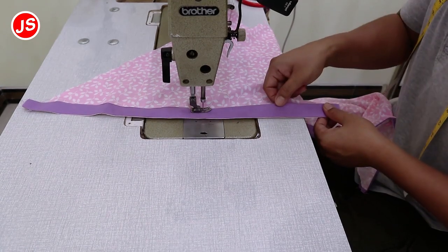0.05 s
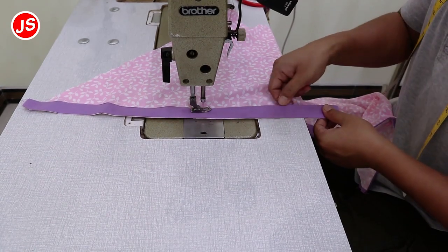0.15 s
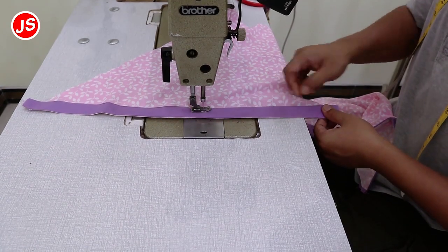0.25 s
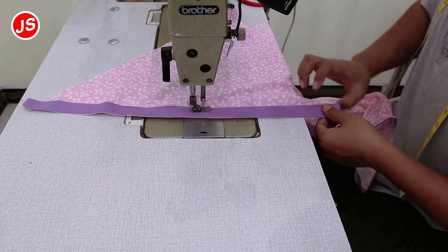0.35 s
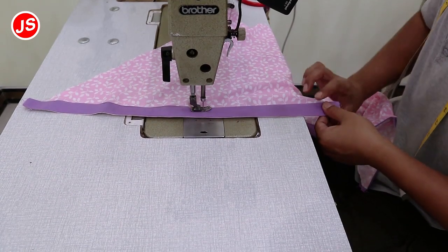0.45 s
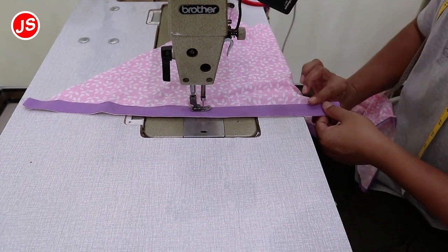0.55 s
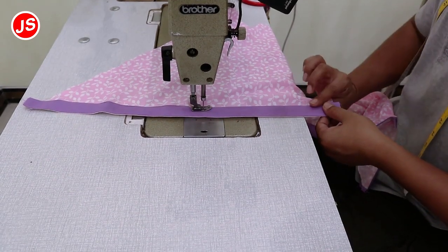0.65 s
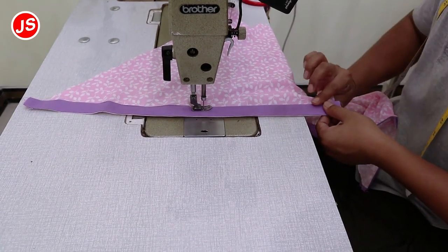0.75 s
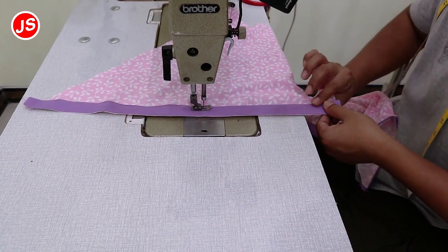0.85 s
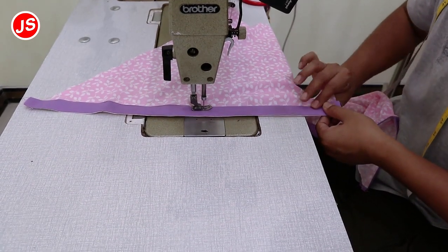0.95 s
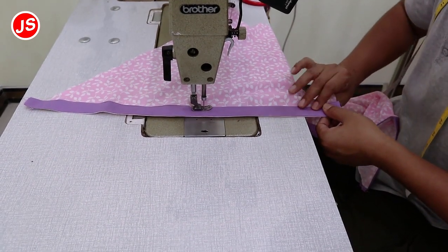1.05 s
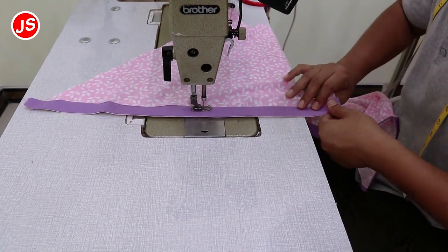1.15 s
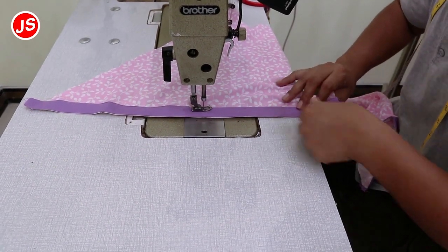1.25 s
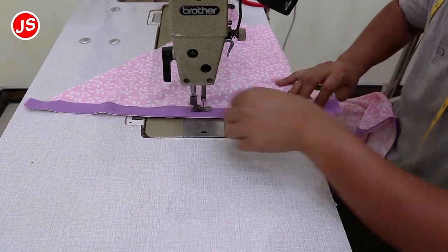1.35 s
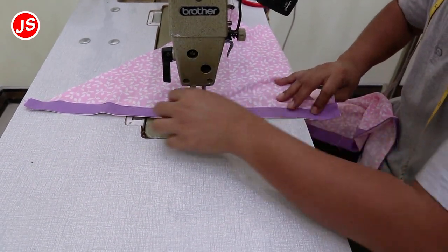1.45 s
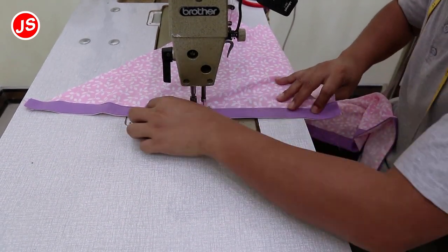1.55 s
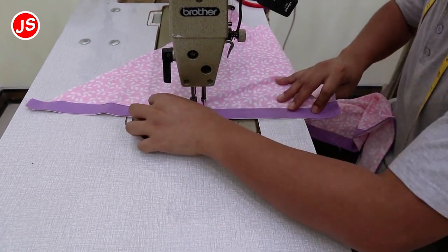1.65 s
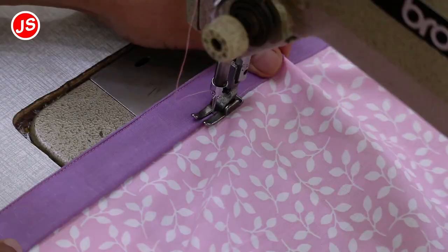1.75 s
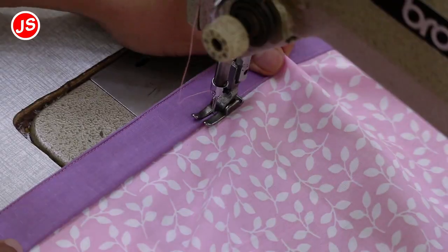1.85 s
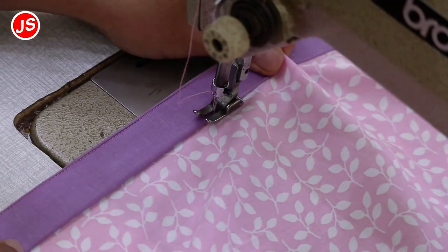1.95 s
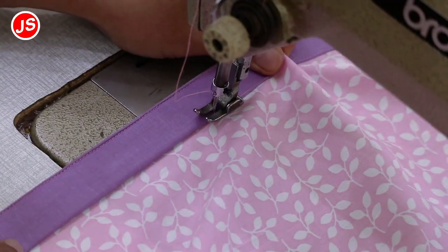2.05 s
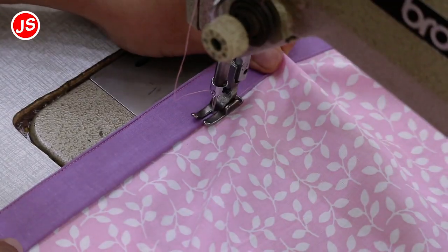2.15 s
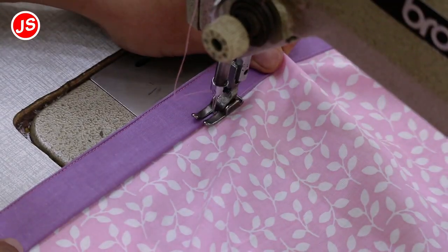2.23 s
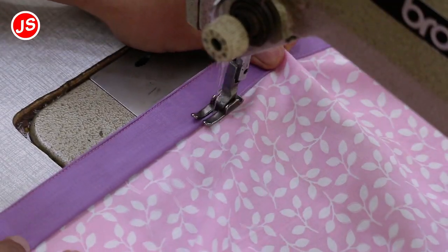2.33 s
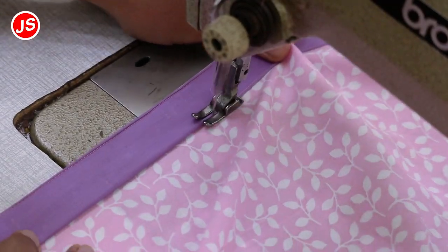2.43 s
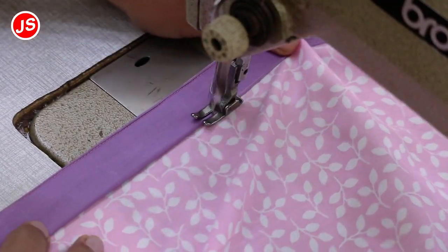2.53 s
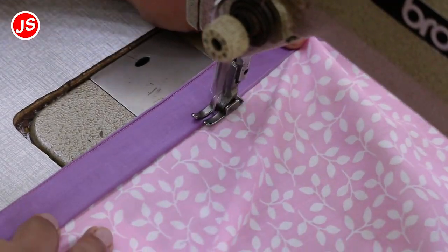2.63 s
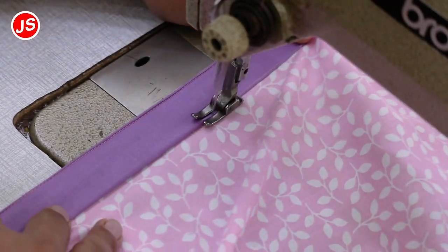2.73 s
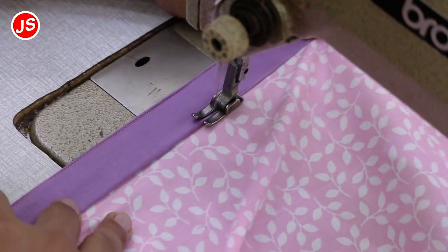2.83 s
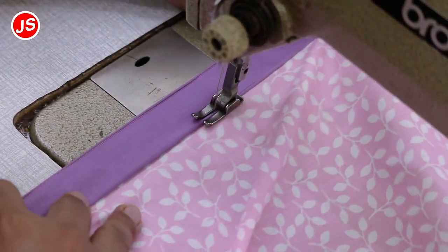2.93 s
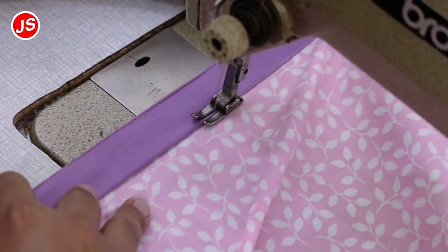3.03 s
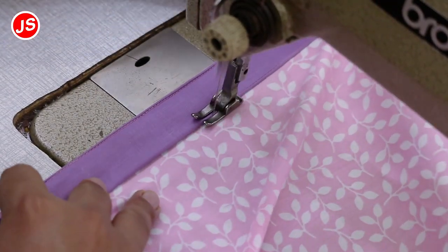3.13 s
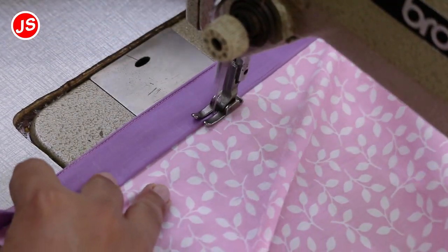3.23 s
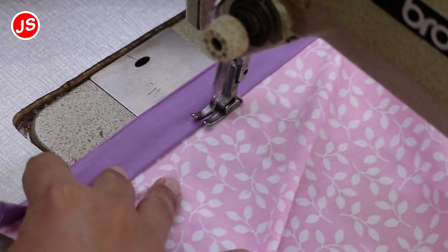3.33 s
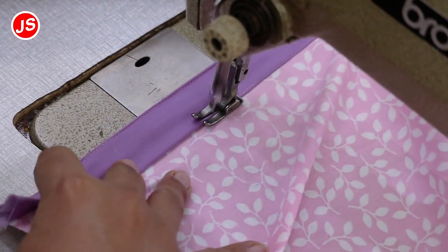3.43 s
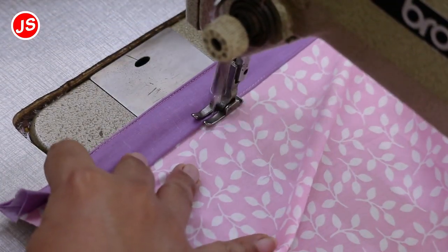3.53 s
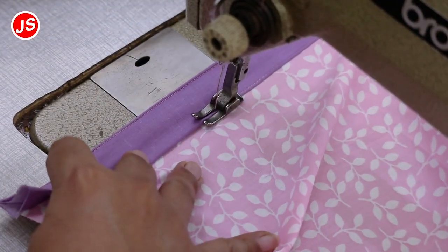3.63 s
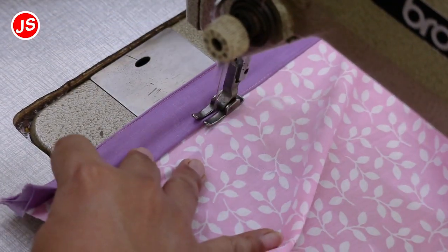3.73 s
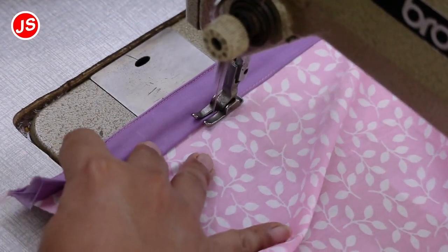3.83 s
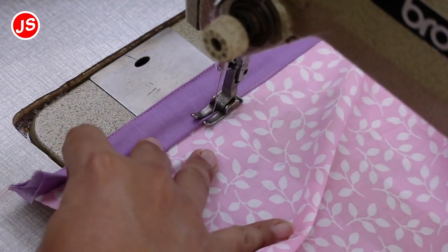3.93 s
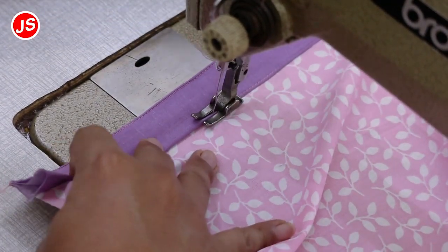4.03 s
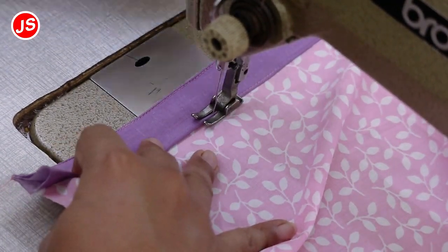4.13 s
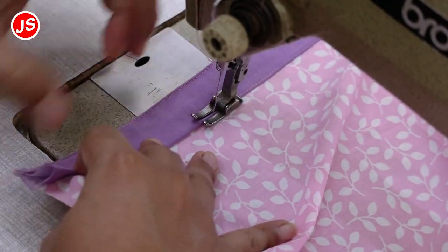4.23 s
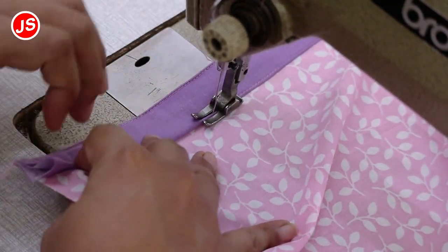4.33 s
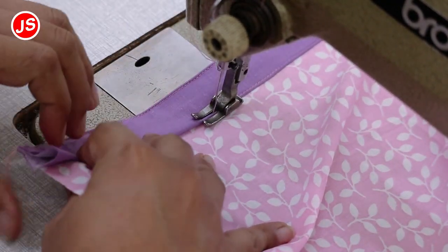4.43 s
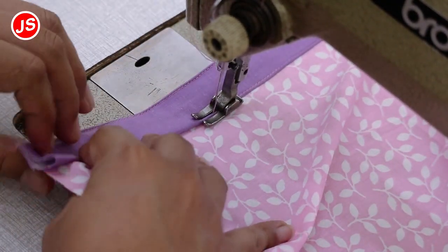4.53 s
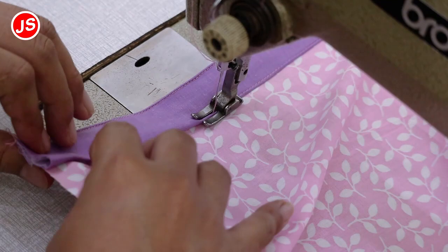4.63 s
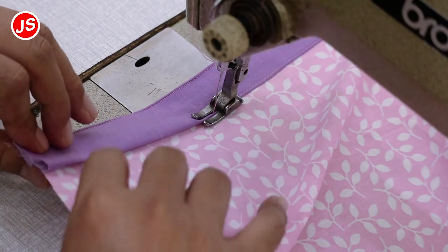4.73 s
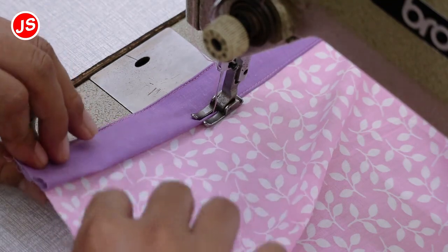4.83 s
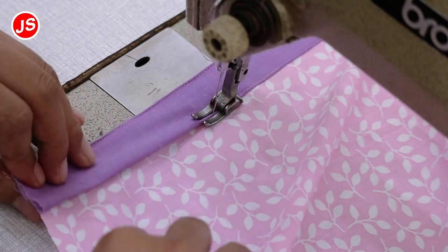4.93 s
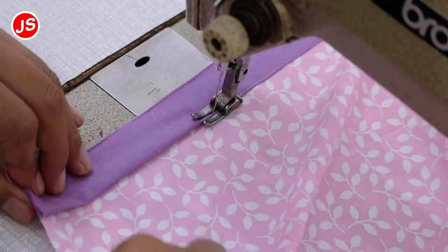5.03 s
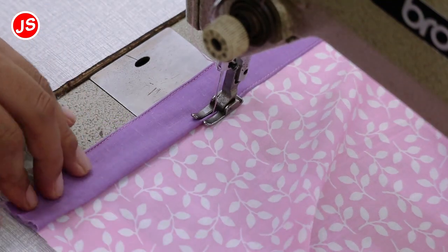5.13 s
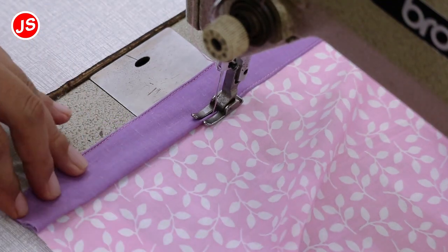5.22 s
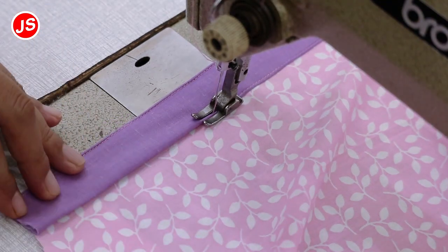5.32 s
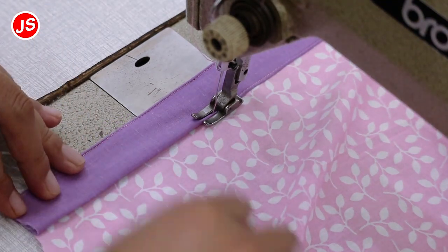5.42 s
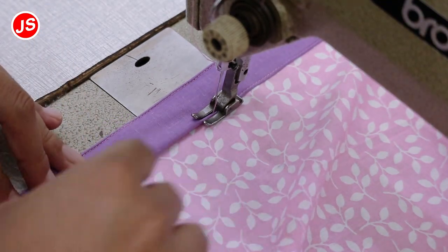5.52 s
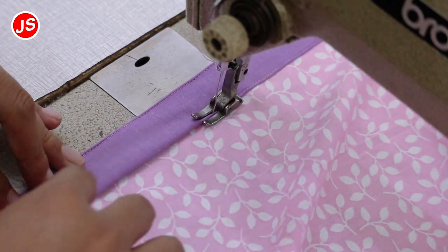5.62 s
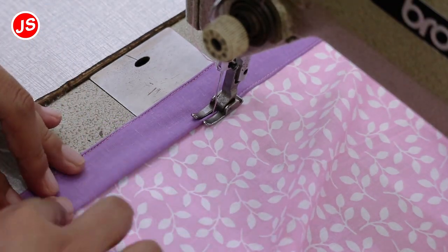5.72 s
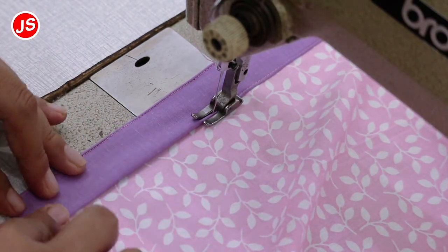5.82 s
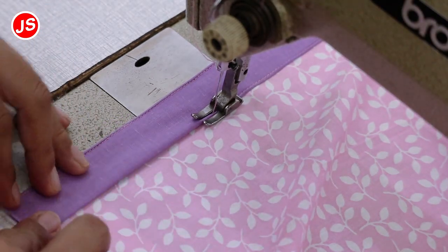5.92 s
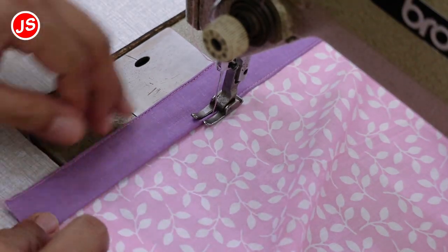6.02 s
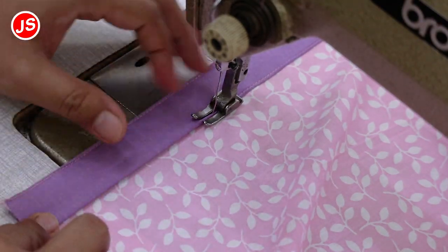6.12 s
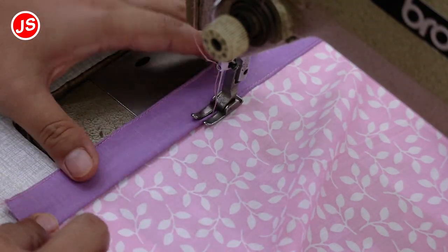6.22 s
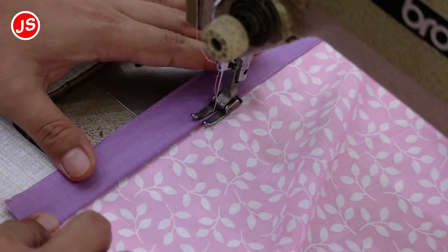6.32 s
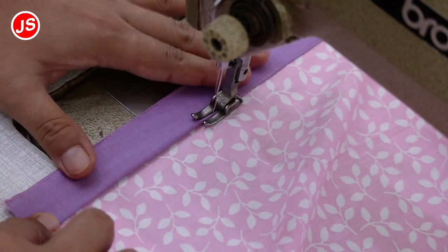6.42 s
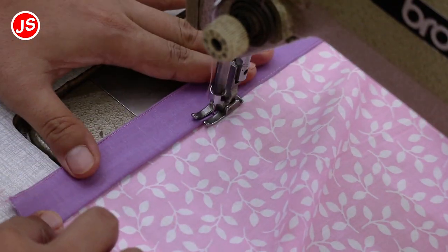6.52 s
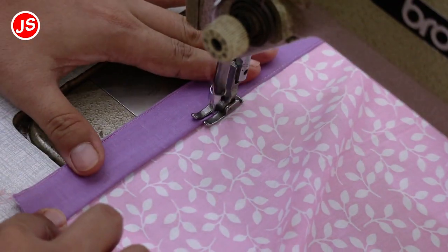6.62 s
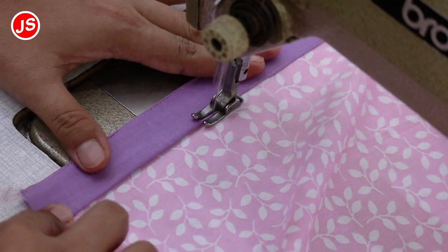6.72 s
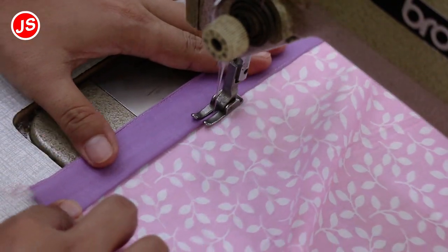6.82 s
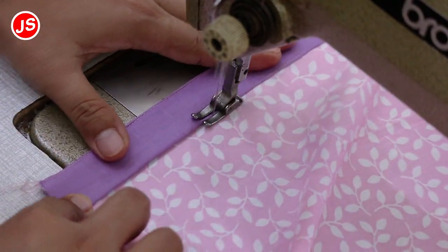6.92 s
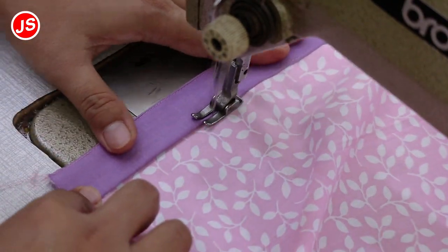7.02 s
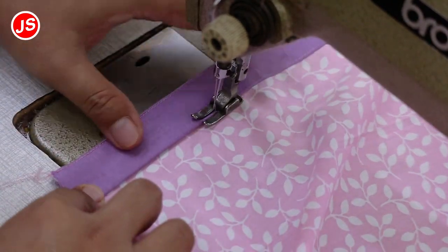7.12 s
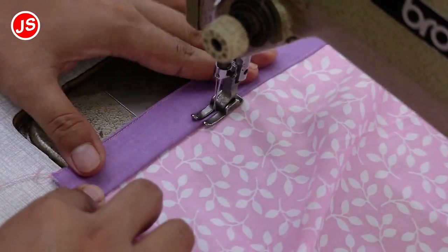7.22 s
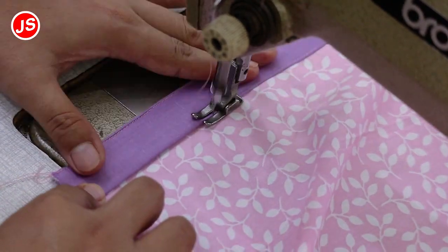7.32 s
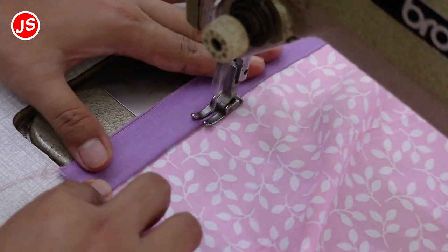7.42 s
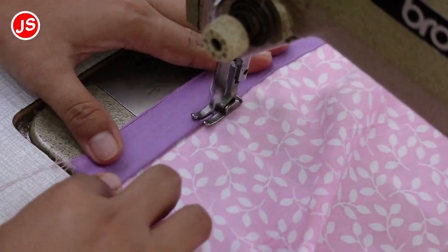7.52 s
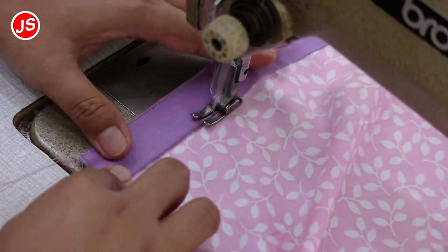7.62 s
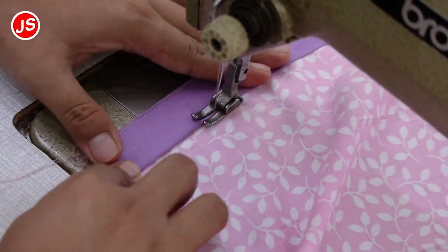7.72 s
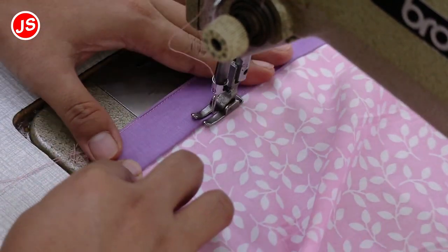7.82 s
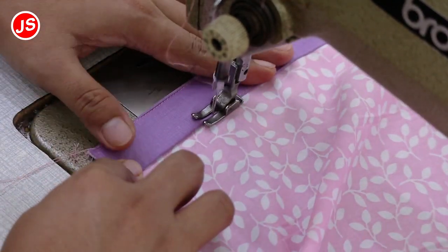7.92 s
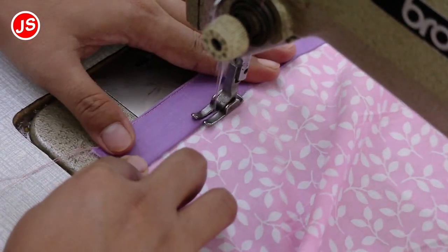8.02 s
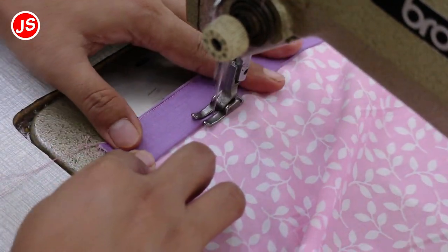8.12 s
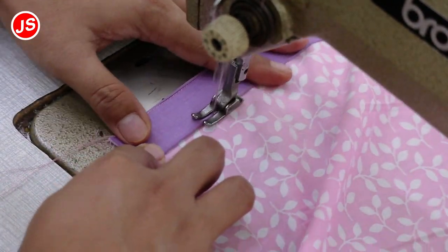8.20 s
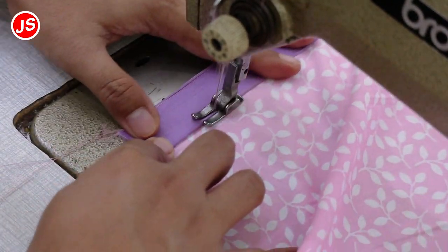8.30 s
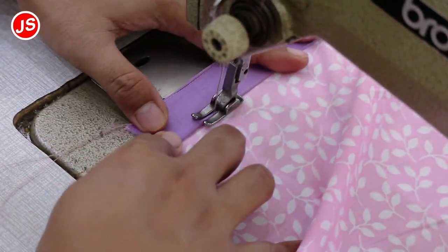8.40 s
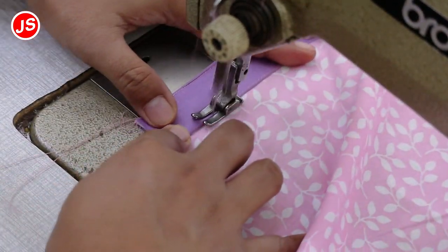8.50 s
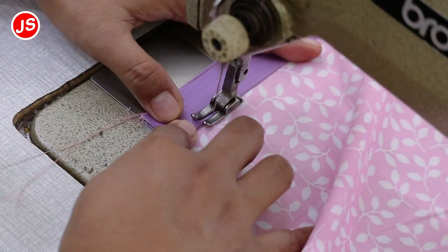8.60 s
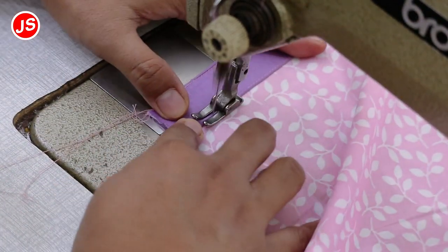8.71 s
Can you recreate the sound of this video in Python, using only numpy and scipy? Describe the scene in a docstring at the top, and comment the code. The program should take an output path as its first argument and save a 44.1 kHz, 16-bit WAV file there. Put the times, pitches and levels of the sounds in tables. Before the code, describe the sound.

An industrial sewing machine rattles through short hard bursts between pedal knocks, fabric rustle and quiet pauses, over a faint motor hum in an echoing workshop.

```python
"""An industrial lockstitch machine sews short runs in a hard-walled workshop.
Room tone and motor hum throughout, cloth rustle at first; two snaps at 1.6 s, then pedal and lever knocks.
Runs at 2.4 s and 3.8 s: contacts ring arm and table once a turn, gears and thread scrape, the servo whines
as it speeds up or brakes. A pause with rustle and small snaps, knocks again, then runs at 6.5, 7.4 and 8.0 s,
the last running to the end. Automatic gain control lowers the level in and shortly after loud runs."""
import sys
import numpy as np
from scipy import signal
from scipy.fft import rfft, irfft, next_fast_len
from scipy.io import wavfile
from scipy.ndimage import uniform_filter1d, map_coordinates

SR = 44100
rng = np.random.default_rng(int(sys.argv[2]) if len(sys.argv) > 2 else 0)


def generate_wav(sig):
    """Save sig (samples, or channels by samples) to the path in sys.argv[1] as 16-bit PCM at SR."""
    pcm = np.round(np.clip(np.atleast_2d(sig).T, -1, 1) * 32767).astype(np.int16)
    wavfile.write(sys.argv[1], SR, pcm)


N = 386316


def amp(db):
    """Decibels to amplitude factor."""
    return 10 ** (np.asarray(db) / 20)


def unit(x):
    """x scaled to rms 1."""
    return x / np.sqrt(np.mean(x ** 2) + 1e-20)


def along(points, hz):
    """(Hz, value) points interpolated on a log frequency axis."""
    f, v = np.transpose(points)
    return np.interp(np.log(hz + 1), np.log(f + 1), v)


def curve(rows):
    """(s, value) rows interpolated to one value per sample."""
    return np.interp(np.arange(N) / SR, *np.transpose(rows))


def wobble(rate_hz):
    """Smooth random curve, rate_hz knots a second."""
    return map_coordinates(rng.standard_normal(int(N * rate_hz / SR) + 4), [np.arange(N) * rate_hz / SR])


def filtered(x, response):
    """x times a complex response of frequency."""
    m = next_fast_len(N + SR // 2)
    return irfft(rfft(x, m) * response(np.fft.rfftfreq(m, 1 / SR)), m)[..., :N]


def modes(table, f):
    """Causal response of (Hz, width Hz, dB) resonances."""
    return sum(amp(db) * 1j * f * w / (c * c - f * f + 1j * f * w) for c, w, db in table)


def band(f, hz, octaves):
    """Bell-shaped band on a log frequency axis."""
    return np.exp(-.5 * (np.log2((f + 1) / hz) / octaves) ** 2)


def noise(spectrum):
    """Gaussian noise of rms 1 with a (Hz, dB per Hz) spectrum."""
    return unit(filtered(rng.standard_normal(N), lambda hz: amp(along(spectrum, hz))))


# room tone spectrum: freq_hz, density_db (relative, per Hz)
ROOM_SPECTRUM = [(12, -57), (20, -76), (53, -3.5), (222, -1), (285, -7.5), (434, -3), (485, -5.5),
                 (678, -10.5), (1030, -10), (1190, -13), (1290, -11), (1400, -17), (1660, -16.5),
                 (16000, -38)]


def room_tone():
    """Shaped noise with slow and quick level wander."""
    return amp(-38.9 + 0.27 * wobble(2.96) + 1.2 * wobble(14)) * noise(ROOM_SPECTRUM)


# idling motor partials: freq_hz, level_db (relative)
HUM_PARTIALS = [(218, -57), (439, -57.5), (915, -60), (1012, -53), (1301, -47), (1445, -61)]
# hum level over time: time_s, gain_db
HUM_GAIN = [(0, 4), (1.55, 4.5), (1.68, 0), (5.3, -3), (5.6, 1.5), (6.5, -0.5)]


def motor_hum():
    """Steady sines of an idling motor, each wavering on its own."""
    t = np.arange(N) / SR
    waver_db = .9
    partials = sum(amp(db + 1.0 + waver_db * wobble(2.4)) * np.sin(2 * np.pi * hz * t)
                   for hz, db in HUM_PARTIALS)
    return partials * amp(curve(HUM_GAIN))


# cloth noise spectrum: freq_hz, density_db (relative, per Hz)
WEAVE = [(1200, 1.5), (3000, 1.5), (5000, 1.5), (8000, -12), (15000, -26)]
# cloth pulls: peak_s, level_db, swell_s (e-fold)
STROKES = [(.25, -44, 0.02), (.44, -45, 0.13), (.6, -50, 0.077), (1.23, -46, 0.013), (1.48, -46.5, 0.075),
           (4.9, -55, 0.027), (5.18, -50, 0.2), (5.375, -46, 0.047), (5.71, -53, 0.041), (5.86, -59, .06),
           (6.08, -57, 0.063), (6.17, -60, 0.018)]
LET_GO_S, STIR_DB = 0.023, -59.5  # e-fold fade after a stroke; faint rustle between strokes


def cloth():
    """Cloth pulled over the table: weave noise swells until the fingers let go."""
    t = np.arange(N) / SR
    strokes = sum(amp(db) * np.exp(-np.where(t < s, (s - t) / swell_s, (t - s) / LET_GO_S))
                  for s, db, swell_s in STROKES)
    weave = unit(noise(WEAVE) * amp(1.2 * wobble(120)))
    return (amp(STIR_DB) + strokes) * weave


# reverberation time: freq_hz, t60_s
WALLS_T60 = [(100, .8), (700, .8), (2000, 1.05), (5000, 1.0), (14000, .7)]
# reverberation level: freq_hz, gain_db
WET_GAIN = [(100, 1), (300, 4), (600, -6.5), (2000, -1.5), (12000, -5)]
NEW_TAIL_S = .4


def walls(x):
    """Overlapping noise tails with a t60 per frequency; a new tail fades in every NEW_TAIL_S."""
    hop = round(NEW_TAIL_S * SR)
    x = np.pad(x, (hop + 300, 2 * hop))  # 300 samples of predelay
    wet = np.zeros(N + 5 * hop + SR)
    fade = np.sqrt(np.hanning(2 * hop + 1)[:-1])  # equal-power crossfade between tails
    for i in range(0, N + hop, hop):
        hz, t, z = signal.stft(rng.standard_normal(SR), SR, nperseg=256)
        decay = amp(-60 * t / along(WALLS_T60, hz)[:, None])
        tail = signal.istft(z * decay, SR, nperseg=256)[1][:SR]
        tail = tail / np.linalg.norm(tail)
        wet[i:i + 2 * hop + SR - 1] += signal.fftconvolve(x[i:i + 2 * hop] * fade, tail)
    return filtered(wet[hop:hop + N], lambda f: amp(along(WET_GAIN, f)))


# snaps on the table: start_s, bright_db, ring_db, thud_db (levels relative)
CLICKS = [(1.5968, -23.5, -19.5, -35), (1.6423, -20.5, -18.5, -39), (5.013, -46, -31, -21),
          (5.019, -20.5, -20.5, -33), (5.51, -48, -36, -44), (5.6907, -38, -28, -36)]


def clicks():
    """Sharp noise snap with a short low ring and thud of the table top."""
    snaps, rings, t = np.zeros(N + SR), np.zeros(N + SR), np.arange(SR // 20) / SR
    snap_t60_s, ring_t60_s, thud_t60_s = 0.0054, 0.0096, 0.029
    ring = np.sin(2 * np.pi * 880 * t) + np.sin(2 * np.pi * 1270 * t)
    thud = np.sin(2 * np.pi * 380 * t)
    for s, bright_db, ring_db, thud_db in CLICKS:
        here = slice(round(s * SR), round(s * SR) + len(t))
        snaps[here] += amp(bright_db + 6.0 - 60 * t / snap_t60_s) * rng.standard_normal(len(t))
        rings[here] += amp(ring_db - 60 * t / ring_t60_s) * ring
        rings[here] += amp(thud_db + 0.5 - 60 * t / thud_t60_s) * thud
    return filtered(snaps[:N], lambda f: band(f, 4600, .5)) + rings[:N]


# arm, bed and table resonances, also used by the machine: freq_hz, width_hz, gain_db
BODY = [(405, 55, -4), (188, 32, -4), (735, 190, -2), (1420, 40, -14), (1880, 50, -10), (2280, 40, -15),
        (2580, 40, -16), (3410, 40, -10), (3550, 40, -8), (4080, 60, -7), (4760, 50, -4)]
# small hardened parts, also used by the machine: freq_hz, width_hz, gain_db
STEEL = [(5550, 150, -5), (8100, 350, -5)]
# pedal linkage resonances: freq_hz, width_hz, gain_db
LEVER = [(640, 60, -4), (1020, 40, 1), (1110, 11, 7)]
# pedal, lever and take-up knocks: start_s, dull_db, hard_db, bright_db, steel_db, linkage_db (levels relative)
KNOCKS = [(1.965, -27, -19.5, -57, -61, -43), (1.977, -13, -38, -20, -37.5, -51),
          (1.989, -12, -18, -38, -53, -36), (2.023, -32, -21, -42, -48, -33),
          (2.044, -19.5, -31, -38, -41, -33), (2.15, -19.5, -30, -26, -39, -36.5),
          (2.194, -18, -30, -32, -45, -48), (2.232, -8.5, -34, -48, -36, -36),
          (2.246, -13, -30, -16.5, -29, -30), (2.258, -14, -18.5, -25, -44, -22.5),
          (2.3, -28, -30, -18.5, -32, -42), (2.338, -10, -11, -11.5, -22, -45),
          (2.364, -3.5, -10.5, -13, -19, -27), (2.389, -7.5, -11, -14, -16, -33),
          (2.434, -6.5, -27, -12.5, -27, -40), (2.475, -28, -23, -16, -19, -39),
          (3.782, -22, -32, -20, -21, -23), (4.051, -32, -34, -24, -50, -26),
          (6.32, -25.5, -27.5, -34, -44, -29.5), (6.513, -27, -26, -26.5, -50, -50),
          (6.525, -20, -20, -21, -22.5, -46), (6.542, -11, -16, -18, -43, -42),
          (6.56, -6.5, -12.5, -18.5, -31, -29), (6.594, -13, -14.5, -21, -21, -32),
          (6.626, -10.5, -22, -22, -19, -33), (6.653, -34, -37, -28, -33, -50),
          (6.708, -8, -32, -20, -23, -36), (6.764, -7.5, -17, -14, -15, -28),
          (6.783, -7, -15, -13, -19, -44), (7.388, -15, -21, -21, -24, -37),
          (7.422, -9, -32, -32, -26, -38), (7.441, -18, -29, -31, -24, -36),
          (7.461, -7, -18, -26, -27, -46), (8.034, -6.5, -17, -25, -16, -34),
          (8.069, -4, -44, -26, -43, -33), (8.114, -2, -11, -16, -20, -34)]
# burst decay: t60_s of dull, hard, bright, steel
KNOCK_T60_S = [.075, .07, .028, .04]
BRAKE_KNOCK_DB, BRAKE_BITES_S = (-4, -20, -13, -39, -36), .018  # same five levels at every full stop; delay
FULL = 28.917  # full speed, turns per s
# pedal moves, also used by the shaft: start_s, goal_turns_per_s
PEDAL = [(2.362, FULL), (3.6474, 0), (3.78, FULL), (3.9629, 0), (6.5184, 14.8), (6.7776, FULL), (7.1301, 0),
         (7.4112, FULL), (7.7851, 21.74), (7.8358, 0), (8.0469, FULL), (8.534, 24.26), (8.6835, 14.93)]


def knocks():
    """Dying bursts of small contacts through body and bare steel; each blow also rings the linkage."""
    bursts, t = np.zeros((5, N + SR)), np.arange(SR // 4) / SR
    stops = [(s + BRAKE_BITES_S, *BRAKE_KNOCK_DB) for s, goal in PEDAL if goal == 0]
    attack = 1 - np.exp(-t / 0.0022)
    fades = amp(-60 * t / np.array(KNOCK_T60_S)[:, None]) * attack
    for s, *levels_db, linkage_db in list(KNOCKS) + stops:
        i = round(s * SR)
        burst = rng.standard_normal(len(t)) * fades
        bursts[:4, i:i + len(t)] += amp(levels_db)[:, None] * burst
        bursts[4, i] = amp(linkage_db)

    def paths(f):
        """Responses: dull, hard, bright, steel, linkage."""
        return [amp(24.5) * band(f, 374, 0.76) * (modes(BODY, f) + amp(-21)),
                amp(16.0) * band(f, 1560, 0.46) * (modes(BODY, f) + amp(-4)),
                amp(12.5) * band(f, 3700, 0.34) + 0j,
                amp(16.5) * band(f, 5500, 0.74) * (modes(STEEL[1:], f) + amp(-12.5)),
                amp(60) * band(f, 570, 0.84) * modes(LEVER, f)]

    return filtered(bursts[:, :N], paths).sum(0)


SPEED_UP_S, BRAKE_S = .0508, .0304  # exponential time constants


def shaft():
    """Turns per second: each pedal move starts a new exponential approach to its goal."""
    t, speed = np.arange(N) / SR, np.zeros(N)
    for s, goal in PEDAL:
        i = round(s * SR)
        lag_s = SPEED_UP_S if goal > speed[i] else BRAKE_S
        speed[i:] = goal + (speed[i] - goal) * np.exp(-(t[i:] - s) / lag_s)
    return uniform_filter1d(speed, size=500)


# contacts in one turn: turn_part, level_db (relative), centre_hz, spread_octaves, scatter_db, chatter_s
CONTACTS = [(-.01, 4, 740, .27, 1, 0), (.23, -13, 360, .3, 1.5, 0), (.44, -7.5, 450, .4, 1.5, 0),
            (.53, -11.5, 700, .25, 1.2, 0), (.34, -14, 1400, .3, 1.2, 0), (.24, -15, 2300, .5, 2, .003),
            (.45, -20, 9200, .5, 4, .003), (.79, -18, 4800, .7, 2.5, .003), (.64, -26, 8100, .3, 2.5, .004)]


def contacts(turns, pace):
    """Blows at fixed shaft angles ring the body and steel parts; faster parts hit harder."""
    out = np.zeros(N)
    for part, db, hz, octaves, scatter_db, chatter_s in CONTACTS:
        at = np.flatnonzero(np.diff(np.floor(turns - part)) > 0)
        blows = np.zeros(N)
        blows[at] = amp(scatter_db * rng.standard_normal(len(at))) * pace[at] ** 0.58
        if chatter_s:  # loose parts rebound many times instead of striking once
            decay = np.exp(-1 / (chatter_s * SR))
            blows = signal.lfilter([1], [1, -decay], blows) * rng.standard_normal(N)
        rung = filtered(blows, lambda f: band(f, hz, octaves) * (modes(BODY + STEEL, f) + amp(-8.5)))
        out += amp(db + 6) * unit(rung)
    return out


# table shake by reciprocating parts: shaft_multiple, level_db (relative)
SHAKE = [(2, -21), (3, -16), (4, -15), (5, -13), (6, -3.5), (7, -2.5), (8, -15), (9, -11), (12, -9),
         (17, -9)]


def table_shake(turns, pace):
    """Unbalance of the reciprocating parts: shaft harmonics growing fast with speed."""
    shake = sum(amp(db) * np.cos(2 * np.pi * k * (turns - .25)) for k, db in SHAKE)
    return amp(8.0 + 0.13 * wobble(3.9)) * shake * pace ** 3


# gear and belt teeth: shaft_multiple, level_db (relative)
MESH = [(42, -11), (48, -12), (49, -4), (50, -13), (57, -13), (65, -12), (79, -17), (84, -18)]


def tooth_mesh(turns, pace):
    """Gear and belt teeth: high shaft multiples, each wavering in level."""
    mesh = sum(amp(db + 0.68 * wobble(3.2)) * np.cos(2 * np.pi * (k * turns + rng.random()))
               for k, db in MESH)
    return amp(6.5) * mesh * pace ** 3


# gears, hook and thread spectrum: freq_hz, density_db (relative, per Hz)
RATTLE = [(24, -62), (45, -25), (70, -12), (140, -10), (195, -4), (290, -13), (410, -3), (530, -8),
          (730, -4.5), (1100, -8), (1900, -12), (5500, -22), (9000, -30), (16000, -38)]


def thread_scrape(turns, pace):
    """Hook and thread noise, hardest in the middle of each turn, coloured by body and steel."""
    gate = amp(1.6 * np.cos(2 * np.pi * (turns - .5)) + 2 * wobble(150) + .8 * wobble(25))
    scrape = filtered(noise(RATTLE), lambda f: 1 + amp(5) * abs(modes(BODY[3:] + STEEL, f)))
    return amp(14) * unit(scrape * gate) * np.clip(pace * 1.7, 0, 1)


POLES = 24  # servo force pulses per turn
PULL_DB, BRAKE_DB = 1.5, 4.5  # torque gain at hardest pull and hardest braking


def servo_whine(turns, pace):
    """Pole frequency glides with the shaft under torque, loudest as it crosses a body resonance."""
    push = np.gradient(pace) * SR
    pull, brake = np.clip(push * SPEED_UP_S, 0, 1), np.clip(-push * BRAKE_S, 0, 1)
    torque = amp(PULL_DB) * pull ** .75 + amp(BRAKE_DB) * brake ** 1.4
    whine = np.sin(2 * np.pi * POLES * turns + .5 * wobble(120)) * torque * amp(1.5 * wobble(70))
    return filtered(whine, lambda f: band(f, 490, .4) * (modes(BODY[:1], f) + amp(-6)))


# level of the running mechanism over time: time_s, gain_db
MECHANISM_LEVEL = [(2.35, -33.5), (2.6, -30), (3.5, -27.5), (3.65, -27.5), (3.9, -27.5), (6.55, -40.5),
                   (6.7, -35), (6.85, -33), (7.1, -30), (7.5, -29.5), (7.8, -28), (8.15, -28), (8.6, -27.5),
                   (8.76, -33.5)]
PARKED_TURN = .4545  # shaft angle at the start, part of a turn


def machine():
    """Contacts, shake, mesh, scrape and servo whine, all tied to the shaft angle."""
    speed = shaft()
    turns = PARKED_TURN + np.cumsum(speed) / SR
    pace = np.abs(speed) / FULL
    mechanism = contacts(turns, pace) + table_shake(turns, pace)
    mechanism += tooth_mesh(turns, pace) + thread_scrape(turns, pace)
    return amp(curve(MECHANISM_LEVEL)) * mechanism + servo_whine(turns, pace)


def scene():
    """Direct sound, its reverberation and the shop background."""
    background = room_tone() + motor_hum() + cloth()
    snaps = clicks()  # close to the microphone, so drier
    near = knocks() + machine()
    return (near + snaps + walls(near + amp(-3) * snaps) + background)[None]


TOP_HZ = 15830


def record(dry):
    """Gain control follows recent mean power; peaks round off; nothing passes above TOP_HZ."""
    window = round(.72 * SR)
    power = np.cumsum(np.pad(dry[0] ** 2, (window, 0), mode="symmetric"))
    level_db = 10 * np.log10(np.abs(power[window:] - power[:-window]) / window + 1e-12)
    cut_db = 0.42 * np.clip(level_db + 36.5, 0, None)  # threshold -36.5 dB
    lag = np.exp(-1 / (.16 * SR))
    cut_db = signal.lfilter([1 - lag], [1, -lag], cut_db)
    x = dry * amp(-cut_db)
    x = x / (1 + np.abs(x / .7) ** 4) ** (1 / 4)
    return filtered(x, lambda hz: hz < TOP_HZ)


dry = scene()
out = record(dry)
generate_wav(out)
```